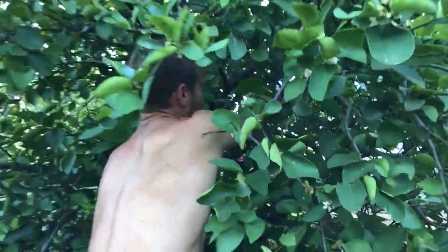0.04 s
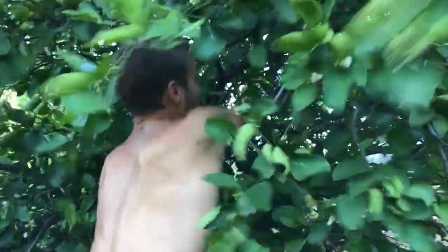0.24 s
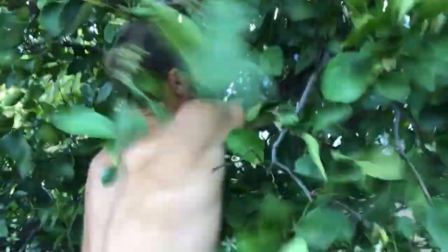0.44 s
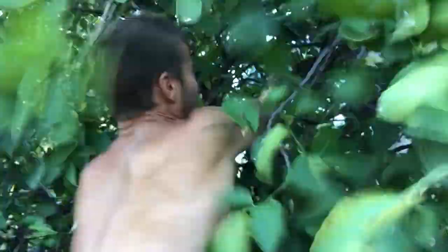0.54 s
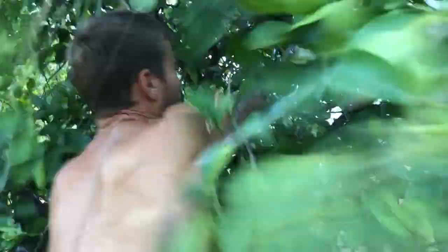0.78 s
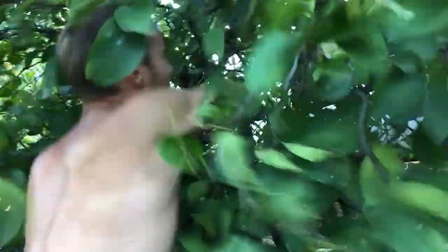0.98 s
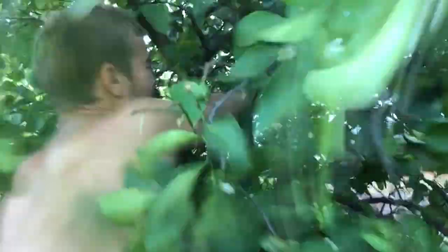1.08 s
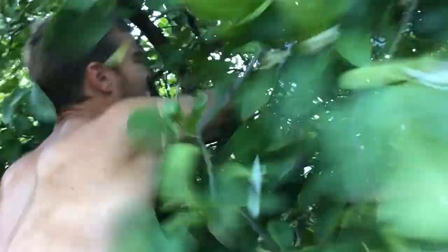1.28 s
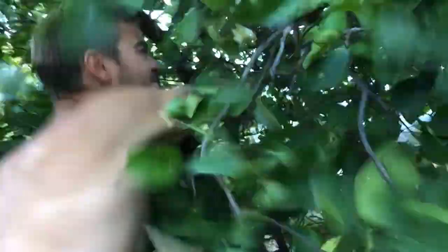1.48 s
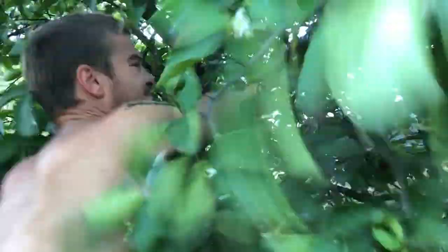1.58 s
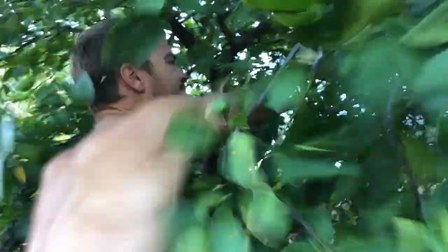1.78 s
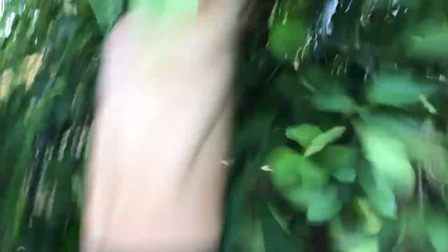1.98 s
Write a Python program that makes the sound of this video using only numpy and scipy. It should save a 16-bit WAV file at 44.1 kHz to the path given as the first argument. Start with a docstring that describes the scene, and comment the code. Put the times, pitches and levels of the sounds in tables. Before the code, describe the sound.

A tree rustles as it is shaken in a garden, heard from among its branches. It begins faintly with a few light ticks, then swells from about 0.3 seconds into a dense rush of leaves that holds until the end at 2 seconds. From 0.8 seconds, close leaves slap, twigs snap and swishing boughs push soft puffs of air onto the microphone. The sharpest snap comes near 1.7 seconds.

```python
"""A leafy tree rustles as it is shaken in a garden, heard in mono from among its branches.
Thousands of leaf contacts add incoherently into a rush that swells with the shaking. Near leaves tick
and slap, a few twigs snap and ring, and the foliage scatters the slaps and snaps into a short tail.
Swinging boughs swish and push soft puffs of air onto the microphone. A faint low hum lies underneath."""
import sys
import numpy as np
from scipy import signal
from scipy.io import wavfile

SR = 44100
rng = np.random.default_rng(int(sys.argv[2]) if len(sys.argv) > 2 else 0)


def file_out(sig):
    """Save sig as 16-bit WAV at sys.argv[1]."""
    # one column per channel
    cols = np.atleast_2d(sig).T
    # limit, then scale
    lim = np.clip(cols, -1, 1)
    pcm = np.round(lim * 32767).astype(np.int16)
    wavfile.write(sys.argv[1], SR, pcm)


N = 89346
T = np.arange(N) / SR


def from_db(db):
    """Amplitude grows tenfold for every 20 dB."""
    return 10 ** (np.asarray(db) / 20)


def unit_rms(x):
    """Normalisation to unit mean power."""
    return x / np.sqrt(np.mean(x ** 2) + 1e-20)


def band(x, low_hz, high_hz, order=2):
    """Butterworth band-pass, its edges held below the Nyquist frequency."""
    high_hz = min(high_hz, .45 * SR)
    low_hz = min(low_hz, high_hz / 2 ** .1)
    sos = signal.butter(order, [low_hz, high_hz], "band", fs=SR, output="sos")
    return signal.sosfilt(sos, x + 1e-18)


def drift(rate_hz):
    """Low-passed noise gives a slow random modulation of unit rms."""
    step, settle = 40, 2000
    pole = np.exp(-2 * np.pi * rate_hz * step / SR)
    noise = rng.standard_normal(N // step + settle + 2)
    slow = signal.lfilter([1], [1, -2 * pole, pole * pole], noise)[settle:]
    return np.interp(np.arange(N) / step, np.arange(len(slow)), unit_rms(slow))


def coloured_noise(spectrum, envelope):
    """Independent half-octave bands, each under its own call of envelope(), sum to unit rms."""
    frequency_hz, density_db = np.transpose(spectrum)
    edges_hz = 25 * 2 ** np.arange(0, 9.6, .5)
    out = np.zeros(N)
    for low, high in zip(edges_hz, edges_hz[1:]):
        band_db = np.interp(np.log(np.sqrt(low * high)), np.log(frequency_hz), density_db)
        out += from_db(band_db) * band(rng.standard_normal(N) * envelope(), low, high)
    return unit_rms(out)


# Spectrum of the outdoor air: frequency_hz, relative_density_db
AIR_SPECTRUM = [(25, -17), (60, 3), (110, 2), (250, -5), (600, -13.5), (2000, -16), (8000, -21),
                (15500, -34)]

def garden(air_db=-67.5, hum_db=-73, hum_hz=95):
    """Ambient noise floor: stationary noise with a faint pure tone."""
    air = from_db(air_db) * coloured_noise(AIR_SPECTRUM, lambda: 1)
    hum = from_db(hum_db) * np.sqrt(2) * np.sin(2 * np.pi * hum_hz * T)
    return air + hum


def noise_swell(peak_s, level_db, half_length_s, low_hz, high_hz):
    """Amplitude modulation: band-limited noise under a Gaussian envelope."""
    bell = np.exp(-.5 * ((T - peak_s) / half_length_s) ** 2)
    swell = bell * band(rng.standard_normal(N), low_hz, high_hz, order=3)
    return from_db(level_db) * unit_rms(swell) * np.sqrt(np.mean(bell ** 2))


# Dull brushes against the branches: peak_s, level_db, half_length_s, low_hz, high_hz
BRANCH_BRUSHES = [(0.012, -53.5, 0.0098, 180, 1130), (0.055, -55, .006, 180, 594)]

def branch_brushes():
    """Sliding friction against a branch gives a brief, dull noise."""
    return sum(noise_swell(*brush) for brush in BRANCH_BRUSHES)


# Puffs of air from passing boughs: peak_s, level_db, half_length_s, low_hz, high_hz
AIR_PUFFS = [(0.832, -43, .014, 253, 630), (0.948, -49, .012, 55, 150), (0.998, -48.5, 0.021, 45, 177),
             (1.169, -39, 0.022, 50, 267), (1.227, -43, .015, 42, 100), (1.236, -33, 0.0025, 230, 458),
             (1.358, -42, 0.017, 55, 260), (1.401, -36, 0.0069, 70.4, 210), (1.474, -48.5, 0.036, 50, 159),
             (1.653, -40, 0.029, 57.6, 203), (1.708, -49, 0.02, 42, 122), (1.82, -53, .012, 50, 100)]

def air_puffs():
    """Air displaced by a bough makes low-frequency pressure fluctuations at the microphone."""
    return sum(noise_swell(*puff) for puff in AIR_PUFFS)


# Envelope of the swish: time_s, level_db
SWISH_ENVELOPE = [(0, -56), (.1, -74), (.17, -64.5), (.25, -65.5), (.35, -54.5), (.55, -49), (.8, -45),
                  (1.05, -46), (1.35, -44.5), (1.55, -44.5), (1.75, -44.5), (2.03, -43.5)]
# Spectrum of the swish: frequency_hz, relative_density_db
SWISH_SPECTRUM = [(35, -28), (70, -12.5), (140, -7.5), (270, 0), (400, -1.5), (700, -3.5), (1300, -4),
                  (2200, -14.5), (4000, -23)]

def bough_swish(flutter_db=1.11, flutter_hz=38):
    """Moving boughs and farther foliage radiate low noise whose bands fluctuate independently."""
    level_db = np.interp(T, *np.transpose(SWISH_ENVELOPE))
    swish = coloured_noise(SWISH_SPECTRUM, lambda: from_db(flutter_db * drift(flutter_hz)))
    return from_db(level_db) * swish


def foliage_scatter(contacts, level_db=-17.5, t60_s=0.082):
    """Multiple scattering among the leaves gives a diffuse, exponentially decaying tail."""
    age_s = T[:SR // 5]
    tail = band(rng.standard_normal(len(age_s)), 660, 9500, order=1) * from_db(-60 * age_s / t60_s)
    return from_db(level_db) * signal.fftconvolve(contacts, tail / np.linalg.norm(tail))[:N]


# Breaking twigs and stalks: start_s, level_db, pitch_hz, t60_s
TWIG_SNAPS = [(0.043, -41.5, 3760, 0.014), (.1597, -40, 2300, 0.0022), (0.2822, -32, 2940, 0.0062),
              (0.2818, -24.5, 12700, 0.0027), (.894, -13, 6500, 0.0025), (1.078, -11.5, 6060, 0.0022),
              (1.1667, -23.5, 1630, 0.011), (1.1673, -15.5, 2440, 0.0064), (1.2958, -19.5, 2700, 0.02),
              (1.412, -13, 5000, 0.0015), (1.6538, -14, 4930, 0.0027), (1.6546, -6.5, 7870, 0.004)]

def twig_snaps(crack_gain_db=-14, crack_decay_s=0.001):
    """Brittle fracture gives a broadband crack and excites one damped mode of the twig."""
    out = np.zeros(N)
    for start_s, level_db, pitch_hz, t60_s in TWIG_SNAPS:
        age_s = np.maximum(T - start_s, 0)
        ring = np.sin(2 * np.pi * pitch_hz * age_s) * from_db(-60 * age_s / t60_s)
        crack = from_db(crack_gain_db) * rng.standard_normal(N) * np.exp(-age_s / crack_decay_s)
        out += from_db(level_db) * (T >= start_s) * (ring + crack)
    return out


# Leaves slapping and scraping close by: start_s, level_db, hold_s, centre_hz
LEAF_SLAPS = [(0.018, -49, 0.0012, 5470), (0.04, -51, 0.015, 5250), (0.046, -53, 0.003, 10000),
              (.109, -53.5, 0.0064, 6000), (0.2845, -43, 0.0071, 9000), (0.453, -38, 0.0066, 4860),
              (0.817, -35, 0.0044, 5500), (0.868, -37, 0.019, 6000), (0.928, -32, .013, 5200),
              (1.074, -33, 0.0056, 6000), (1.1667, -30, 0.0028, 2350), (1.167, -22.5, 0.0067, 9100),
              (1.188, -26, 0.0023, 7000), (1.299, -30, 0.0041, 5500), (1.399, -32, 0.016, 5470),
              (1.498, -26, .003, 5440), (1.56, -32.5, 0.011, 4400), (1.649, -29, 0.014, 5470),
              (1.679, -40, 0.0036, 5500), (1.747, -27, 0.0034, 4560), (1.91, -29.5, 0.0035, 7000),
              (1.924, -29.5, 0.0096, 5260)]

def leaf_slaps(grains_per_s=6100, release_s=0.0032, edge_ratio=1.99):
    """Friction of leaf on leaf: a dense run of impulses starts at once, holds and dies away."""
    out = np.zeros(N)
    for start_s, level_db, hold_s, centre_hz in LEAF_SLAPS:
        grains = rng.standard_normal(N) * (rng.random(N) < grains_per_s / SR)
        scrape = unit_rms(band(grains, centre_hz / edge_ratio, centre_hz * edge_ratio))
        envelope = (T >= start_s) * np.exp(-np.maximum(T - start_s - hold_s, 0) / release_s)
        out += from_db(level_db) * envelope * scrape
    return out


# Mean spectrum of single leaves touching nearby: frequency_hz, relative_density_db
TICK_SPECTRUM = [(300, -7), (1200, -11), (3500, 3.5), (7000, 1.5), (11000, -10), (15500, -10.5)]

def leaf_ticks(ticks_per_s=900, spread_db=4, colour_db=2.5, decay_s=0.00056):
    """Shot noise: near leaves touch at random, each touch a tiny burst with a colour of its own."""
    clumping = from_db(3 * drift(rate_hz=25))
    touches = rng.random(N) < ticks_per_s * clumping / SR
    strengths = touches * from_db(spread_db * np.minimum(rng.exponential(1, N), 3.5))
    energy_retained = np.exp(-2 / (decay_s * SR))

    def band_envelope():
        """Each touch feeds a band a random amount of energy, which decays exponentially."""
        amplitudes = strengths * from_db(colour_db * rng.uniform(-1.4, 1, N))
        energy = signal.lfilter([1], [1, -energy_retained], amplitudes ** 2 + 1e-18)
        return np.sqrt(energy)

    return coloured_noise(TICK_SPECTRUM, band_envelope)


# Spectrum of the whole crown: frequency_hz, relative_density_db
CROWN_SPECTRUM = [(100, -14), (500, -13), (1100, -9.5), (2000, -5), (2700, -4), (3700, -0.7), (5500, -0.8),
                  (8000, -3), (11000, -7), (15500, -9.5)]

def crown_rush(flutter_db=0.67, band_flutter_db=1.11):
    """Incoherent summation: countless leaves merge into a rush that flutters as whole sprays swing."""
    common_db = flutter_db * drift(rate_hz=45)
    return coloured_noise(CROWN_SPECTRUM,
                          lambda: from_db(common_db + band_flutter_db * drift(rate_hz=23)))


# How hard the crown moves, as the envelope of the rustle: time_s, level_db
SHAKE_ENVELOPE = [(0, -60), (.1, -65), (.18, -61.5), (.25, -50.5), (.32, -44.5), (.43, -39.5), (.5, -36),
                  (.65, -33), (.8, -32.5), (.89, -31.5), (1.02, -32), (1.13, -29.5), (1.22, -29.5),
                  (1.28, -31), (1.34, -28.5), (1.45, -28.5), (1.59, -28.5), (1.71, -30), (1.85, -30),
                  (2.03, -30.5)]

def rustle(rush_gain_db=-1, tick_gain_db=-8):
    """Common excitation: the shaking scales the rush and the near ticks alike."""
    shake = from_db(np.interp(T, *np.transpose(SHAKE_ENVELOPE)))
    return shake * (from_db(rush_gain_db) * crown_rush() + from_db(tick_gain_db) * leaf_ticks())


def scene():
    """Superposition: all sources add at one point, and both channels carry the same sound."""
    tree = rustle() + bough_swish() + air_puffs() + branch_brushes()
    contacts = leaf_slaps() + twig_snaps()
    mono = tree + contacts + foliage_scatter(contacts) + garden()
    return np.array([mono, mono])


def record(dry):
    """Band limiting: the microphone loses the deepest bass, and the top is cut steeply."""
    low_hz, high_hz = 35.6, 15900
    thinned = signal.sosfilt(signal.butter(4, low_hz, "high", fs=SR, output="sos"), dry)
    return signal.sosfilt(signal.ellip(12, .1, 80, high_hz, fs=SR, output="sos"), thinned)


dry = scene()
out = record(dry)
file_out(out)
```